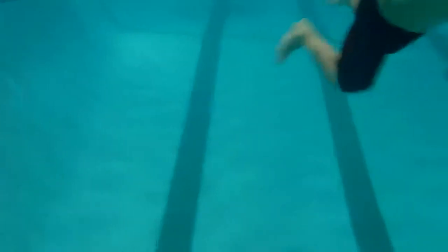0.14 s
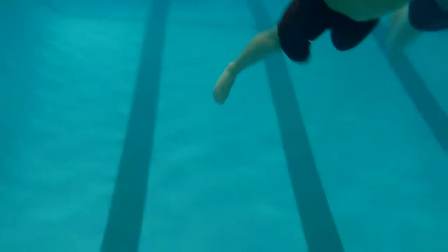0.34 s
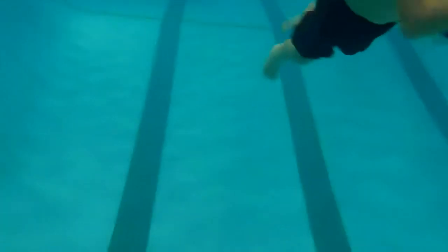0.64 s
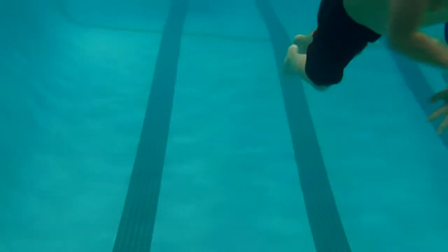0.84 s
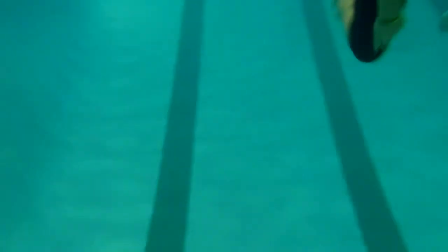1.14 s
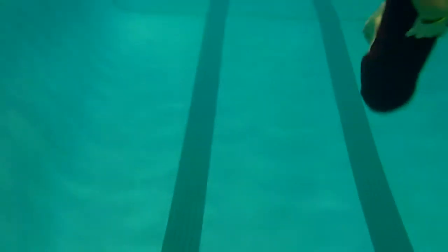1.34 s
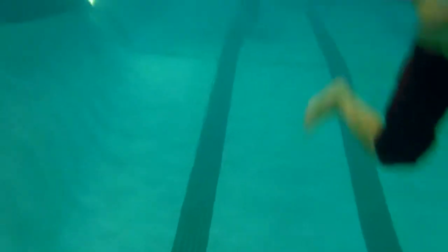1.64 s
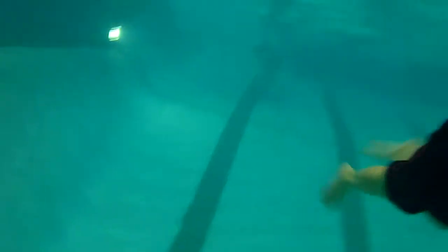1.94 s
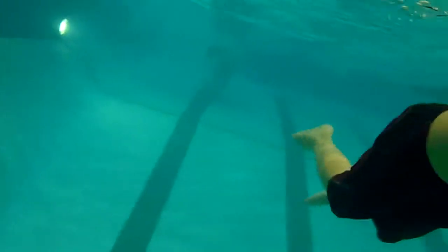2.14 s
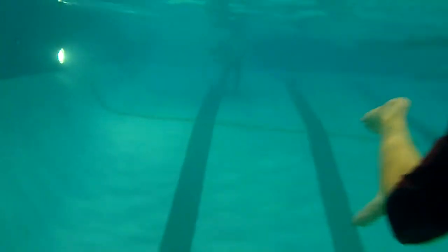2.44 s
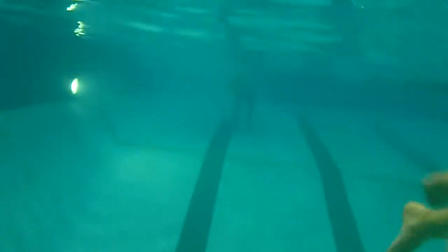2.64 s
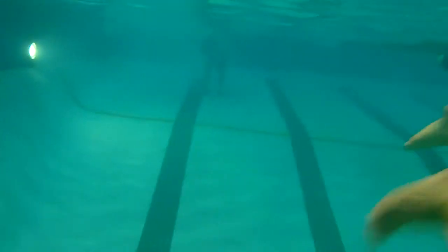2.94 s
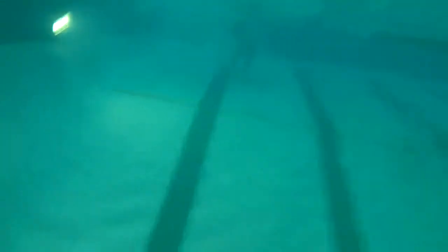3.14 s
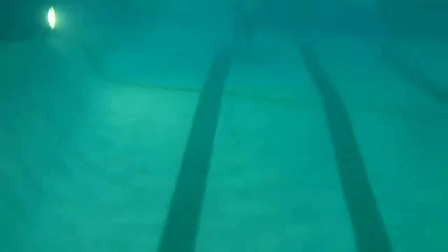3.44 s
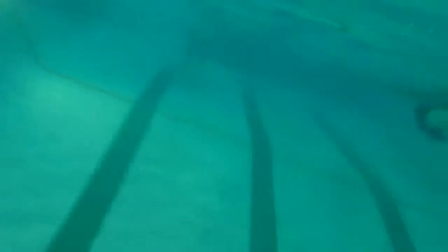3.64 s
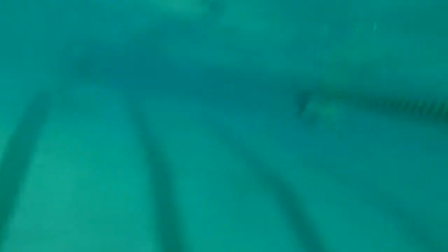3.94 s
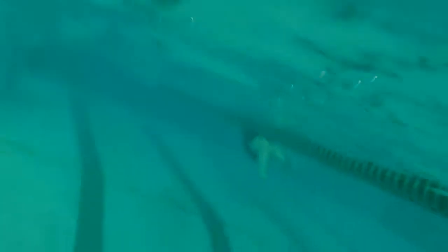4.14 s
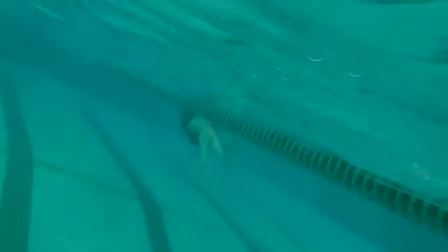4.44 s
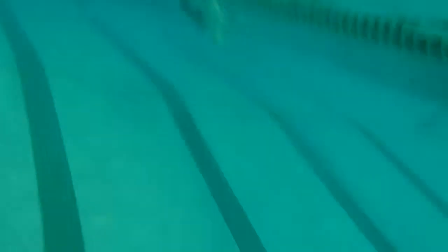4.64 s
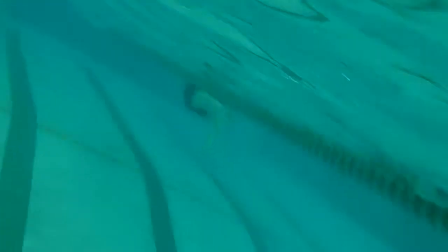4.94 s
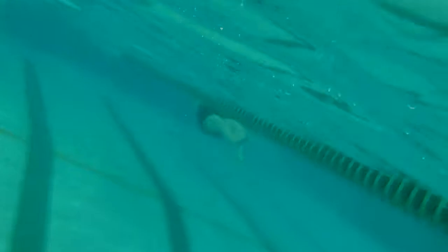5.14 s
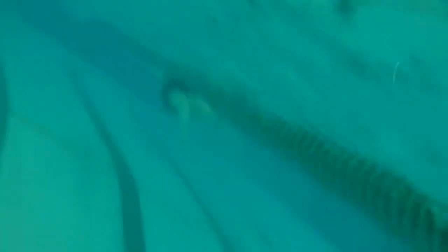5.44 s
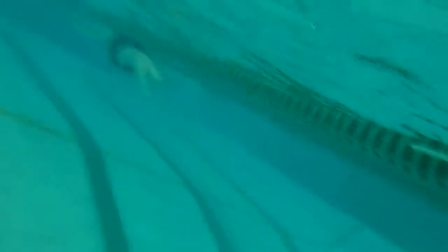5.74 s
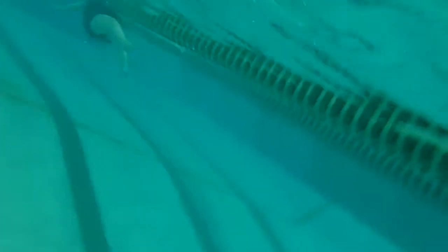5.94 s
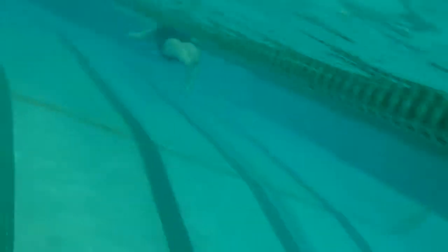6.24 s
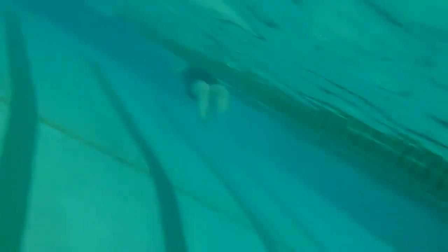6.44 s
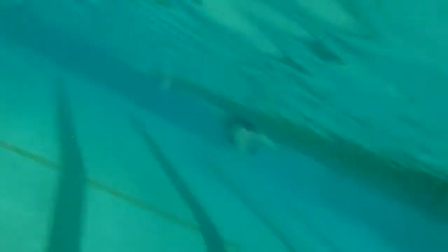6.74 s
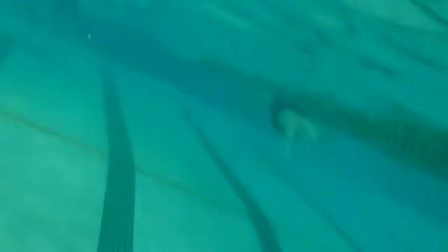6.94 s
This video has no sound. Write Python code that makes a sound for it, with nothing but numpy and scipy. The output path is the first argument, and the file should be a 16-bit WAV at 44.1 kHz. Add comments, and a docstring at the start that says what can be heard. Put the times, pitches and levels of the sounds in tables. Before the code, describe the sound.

Heard from inside the pool water: low rumbling turbulence, dull knocks, plopping bubbles and tiny ticks, turning fuller and rushier after a burst of bubbles.

```python
"""Under water in a pool: a swimmer carries a camera in a sealed housing, with the microphone at its port.
Churn, sway, gurgle and rush are shaped noise; small bubbles ring and a narrow band fizzes amid a faint hiss.
Swirls thump as short low pushes, water swishes, bubbles pop as decaying sines and tick as noise snaps.
A soft tone is heard from 0.6 to 1.1 s. The background dips at listed times and climbs back.
At 4 s a swarm of bubbles rattles and fizzes as the air leaves the port and the cavity changes colour."""
import sys
import numpy as np
from scipy import signal
from scipy.fft import rfft, irfft
from scipy.io import wavfile
from scipy.ndimage import uniform_filter1d

SR = 44100
rng = np.random.default_rng(int(sys.argv[2]) if len(sys.argv) > 2 else 0)


def volts_from_db(level):
    """Convert decibel levels to linear amplitude ratios."""
    exponent = np.asarray(level, float) / 20
    return 10 ** exponent


def log_audio(samples):
    """Write samples as a 16-bit WAV file to the path given in sys.argv[1]."""
    # one column per channel
    frames = np.atleast_2d(samples).T
    # limit to full scale, then quantise
    limited = np.clip(frames, -1, 1)
    pcm = np.round(limited * 32767).astype(np.int16)
    wavfile.write(sys.argv[1], SR, pcm)


N = 313110   # length [samples]


def rms_one(x):
    """Scale to unit rms."""
    return x / np.sqrt(np.mean(x ** 2) + 1e-20)


def in_time(rows):
    """Columns of a curve table at every sample."""
    s, *columns = np.transpose(rows)
    return [np.interp(np.arange(N) / SR, s, c) for c in columns]


def band(x, low_hz, high_hz):
    """Butterworth band-pass."""
    edges_hz = [low_hz, min(high_hz, 0.45 * SR)]
    return signal.sosfilt(signal.butter(2, edges_hz, "band", fs=SR, output="sos"), x)


def drift(rate_hz):
    """Slow chance of about unit spread: coarse noise through two equal one-pole low-passes."""
    hop = 40   # samples between coarse points
    r = np.exp(-2 * np.pi * rate_hz * hop / SR)
    white = rng.standard_normal(N // hop + 2002)
    slow = signal.lfilter([1], [1, -2 * r, r * r], white)[2000:]   # the filter has settled by then
    return np.interp(np.arange(N) / hop, np.arange(len(slow)), rms_one(slow))


def add(out, s, sound):
    """Mix a short sound in at time s, or at the start if s is negative."""
    i = max(round(s * SR), 0)
    out[i:i + len(sound)] += sound[:N - i]


def colour(white, points):
    """Noise given a spectrum in relative dB per Hz, joined along log frequency; rms 1."""
    hz = np.maximum(np.fft.rfftfreq(N, 1 / SR), 1)
    point_hz, point_db = np.transpose(points)
    shape_db = np.interp(np.log(hz), np.log(point_hz), point_db)
    return rms_one(irfft(rfft(white) * volts_from_db(shape_db), N))


def gate(start, end, attack, release):
    """Rise from the start, hold until the end, fall; both ramps are squared."""
    t = np.arange(N) / SR
    rise = (t - start) / attack
    fall = 1 + (end - t) / release
    return np.clip(np.minimum(rise, fall), 0, 1) ** 2


def swirl(low_hz, high_hz, edge_hz, lumpy_db, lumps_hz):
    """Turbulence on the housing: low noise that comes in lumps and falls away above an edge; rms 1."""
    lumpy = rng.standard_normal(N) * volts_from_db(lumpy_db * drift(lumps_hz))
    return rms_one(band(band(lumpy, low_hz, high_hz), 11.7, edge_hz))


def churn(churn_db, cleared, lumps):
    """Low turbulence rumbling on the housing, deeper once the air has left the port."""
    before = swirl(12.4, 103.4, 300, lumpy_db=2.5, lumps_hz=7.2)
    after = swirl(9.3, 67, 280, lumpy_db=3.5, lumps_hz=7.1)
    return volts_from_db(churn_db + 1.1 * lumps) * ((1 - cleared) * before + cleared * after)


def sway():
    """Slow sway of the water: a steady bed of very low, lumpy noise."""
    return volts_from_db(-38) * swirl(10.0, 38, 300, lumpy_db=3.5, lumps_hz=6.0)


def gurgle(churn_rise_db, rush_rise_db, cleared, lumps):
    """Mid-low turbulence that follows the flow and is weaker and less lumpy once the air has left."""
    level_db = -30.5 - 12 * cleared + 0.36 * churn_rise_db + 1.08 * rush_rise_db
    lumpy_db = (4.0 - 2.3 * cleared) * lumps
    return volts_from_db(level_db + lumpy_db) * swirl(85.5, 427, 920, lumpy_db=3.0, lumps_hz=19.4)


def rush(cleared, bright_db, patchy_db, grain_db):
    """Dense tiny bubbles coloured by the cavity; half-octave bands flicker mostly alone."""
    # cavity colour with air at the port: (frequency [Hz], relative level [dB per Hz])
    colour_with_air = [(240, -45), (400, -34), (518, -33), (638, 2), (733, 4), (988, -6.5), (1270, -4),
                       (1530, -7.5), (2590, -24), (2980, -28), (3520, -24.5), (3930, -33.5), (4300, -32),
                       (5590, -72), (9460, -120)]
    # cavity colour once the air has left: (frequency [Hz], relative level [dB per Hz])
    colour_cleared = [(240, -45), (400, -12.5), (520, -14.5), (703, 1.5), (926, -1), (1050, -7.5),
                      (1330, -9.5), (1730, -21.5), (2070, -18.5), (2530, -26), (3050, -40), (4120, -48.5),
                      (5560, -46), (8000, -99), (10400, -85), (17600, -120)]
    grains_per_s = 4000.0
    sizes = volts_from_db(grain_db * np.minimum(rng.exponential(1, (2, N)), 5))
    grains = rng.standard_normal((2, N)) * sizes * (rng.random((2, N)) < grains_per_s / SR)
    spectra = []
    for white in grains:
        before = (1 - cleared) * colour(white, colour_with_air)
        after = cleared * colour(white, colour_cleared)
        spectra.append(rfft(before + after))
    hz = np.fft.rfftfreq(N, 1 / SR)
    together, out = drift(9.1), 0
    for k in range(9):
        steps = 2 * np.log2(np.maximum(hz, 1) / 400) - k   # half octaves from the band's centre
        share = np.sqrt(np.clip(1 - np.abs(steps), 0, 1))   # neighbours overlap
        part = irfft(spectra[k % 2] * share, N)   # neighbours get unrelated grains
        lift = np.clip(1 - abs(k - 5.3) / 3.7, 0, 1)   # brightness acts most near 2.5 kHz
        flicker_db = patchy_db * (0.56 * together + drift(20.0))
        out = out + part * volts_from_db(lift * bright_db + flicker_db)
    return out


def blips(per_s, cycles):
    """Small bubbles at 14 pitches dealt by chance, each fading 60 dB in some cycles; rms 1."""
    clicks = (rng.random(N) < per_s / SR) * volts_from_db(6.6 * np.minimum(rng.exponential(1, N), 3))
    dealt, out = rng.integers(0, 14, N), 0
    for k, hz in enumerate(np.geomspace(550, 3700, 14)):
        r, w = volts_from_db(-60 * hz / (cycles * SR)), 2 * np.pi * hz / SR
        struck = clicks * (dealt == k) + 1e-18
        ring = signal.lfilter([0, np.sin(w)], [1, -2 * r * np.cos(w), r * r], struck)
        out = out + ring * volts_from_db(-9.0 * np.log2(hz / 550))   # smaller bubbles are fainter
    return rms_one(band(out, 460, 6200))


def fizz_band(cleared):
    """A band of grainy fizz near 4.9 kHz; after 4 s only a faint thin line near 5.8 kHz."""
    # swells of the fizz: (time of the middle [s], rise [dB])
    fizz_swells = [(.46, 5.5), (1.76, 3), (2.29, 9), (3.3, 2), (3.88, 8.5)]
    base_db, line_db, swell_s, grains_per_s = -60, -76, 0.1, 5000.0
    t = np.arange(N) / SR
    level_db = base_db + sum(rise_db * np.exp(-((t - s) / swell_s) ** 2) for s, rise_db in fizz_swells)
    sizes = volts_from_db(2.0 * np.minimum(rng.exponential(1, N), 5))
    grains = rng.standard_normal(N) * sizes * (rng.random(N) < grains_per_s / SR)
    fizz = volts_from_db(level_db) * rms_one(band(band(grains, 4420, 5420), 4420, 5420))
    thin_line = volts_from_db(line_db) * rms_one(band(grains, 5770, 5800))
    return volts_from_db(3.1 * drift(47.0)) * ((1 - cleared) * fizz + cleared * thin_line)


def steady_hiss():
    """Faint coloured noise behind the water."""
    # colour of the hiss: (frequency [Hz], relative level [dB per Hz])
    hiss_colour = [(3240, -13.5), (5500, -16), (6530, -16), (13700, -19), (14600, -17), (15000, -60)]
    return volts_from_db(-62) * colour(rng.standard_normal(N), hiss_colour)


def faint_ticks(per_s, smallest_db, low_hz, high_hz):
    """Small band-passed clicks at random times and sizes between the clear ticks."""
    sizes = volts_from_db(5.8 * np.minimum(rng.exponential(1, N), 3)) * rng.choice([-1, 1], N)
    return volts_from_db(smallest_db) * band((rng.random(N) < per_s / SR) * sizes + 1e-18, low_hz, high_hz)


def dips():
    """Gain of the background: a sudden fall, a short hold, a steady climb in dB."""
    # sudden dips of the background: (time [s], depth [dB])
    falls = [(0.0, 12.5), (1.49, 11), (1.85, 6), (1.91, 7.5), (2.01, 5.5), (3.537, 0), (3.563, 11.5),
             (3.891, 5.5), (3.94, 5), (4.03, 18), (4.2, 2), (4.235, 13), (5.163, 9), (5.424, 12),
             (5.803, 7), (5.834, 14.5), (5.88, 4.5), (5.938, 13), (6.201, 5.5), (6.35, 6), (6.932, 3.5)]
    recovery_db_per_s, hold_s = 107, 0.017
    t, depth = np.arange(N) / SR, np.zeros(N)
    for s, depth_db in falls:
        left_db = np.clip(depth_db - recovery_db_per_s * (t - s - hold_s), 0, depth_db)
        depth = np.maximum(depth, (t >= s) * left_db)   # the deepest wins
    return volts_from_db(-uniform_filter1d(depth, size=88))   # 2 ms smoothing


def gushes():
    """Swishes of water over the port: short rough noise, nearly three octaves wide, under a sharp top."""
    # swishes: (time of the middle [s], rms level before the swell [dB], top [Hz], length [s])
    swishes = [(0.027, -51.5, 4130, .06), (0.121, -43, 3020, 0.042), (0.177, -38.5, 3180, 0.017),
               (0.319, -37.5, 5400, .025), (0.403, -36.5, 4140, 0.17), (1.643, -37, 1760, 0.031),
               (2.718, -38, 5200, 0.0079), (3.863, -52, 5800, 0.036), (4.431, -39.5, 3700, .14),
               (4.777, -44, 5000, 0.024), (5.605, -43, 3700, .16), (5.731, -25, 3100, 0.031),
               (5.779, -26.5, 2550, 0.024), (5.862, -27.5, 2530, 0.017), (5.921, -29.5, 2200, 0.029),
               (5.93, -36, 3230, 0.022), (6.692, -34.5, 2800, 0.034), (6.902, -33.5, 3000, 0.044),
               (7.025, -23, 1290, 0.051)]
    out, t = np.zeros(N), np.arange(SR // 4) / SR
    for (s, level_db, top_hz, length), noise in zip(swishes, rng.standard_normal((len(swishes), len(t)))):
        edge = signal.butter(6, top_hz, fs=SR, output="sos")
        swish = rms_one(signal.sosfilt(edge, band(noise, 0.079 * top_hz, 0.53 * top_hz)))
        swell = np.sqrt(np.clip(np.sin(np.pi * np.minimum(t / length, 1)), 0, 1))
        add(out, s - length / 2, volts_from_db(level_db) * swish * swell)
    return out


def thumps():
    """Each swirl against the housing is one soft low push: a short windowed cosine at a random phase."""
    # pushes: (time of the middle [s], envelope peak [dB], pitch [Hz], width at half height [cycles])
    pushes = [(0.207, -15.5, 296, 0.88), (0.328, -7.5, 278, 0.66), (0.358, -14.5, 72, 0.86),
              (0.544, -17, 170, 2.7), (0.579, -7, 69.6, 0.4), (0.581, -6, 225, 1), (.335, -14.5, 130, 1.4),
              (0.506, -21, 60, .8), (0.609, -18.5, 118, 2.2), (1.267, -26, 300, 0.98),
              (1.294, -20.5, 336, 1.03), (1.388, -23, 129, 1.4), (1.425, -11, 269, 1.9),
              (1.432, -16.5, 75.0, 0.99), (1.486, -7, 293, 1.54), (1.75, -13, 263, 0.52),
              (1.764, -18, 260.0, 0.42), (1.775, -15, 267, 0.78), (1.798, -8.5, 89, 0.65),
              (1.815, -11.5, 282, 0.67), (1.844, -6, 296, 2.34), (1.909, -8, 247, 1.08),
              (1.999, -10.5, 81.4, 2.2), (2.008, -7.5, 250, 1.05), (2.064, -11, 320, 0.43),
              (2.101, -13.5, 251.0, 1.3), (2.162, -19, 245, 3.5), (2.378, -13, 302, 0.55),
              (2.4, -15, 257, 3.2), (2.417, -7.5, 314, 0.45), (2.432, -11.5, 333, 1.3),
              (2.626, -12, 265, 1), (2.694, 0, 256, 0.45), (2.76, -15.5, 84, 1.2), (2.758, -6, 263, 0.71),
              (2.776, -7, 270, 0.86), (3.059, -17, 278, 1.2), (3.076, -10, 251, 0.71),
              (3.076, -6.5, 81, 0.62), (3.204, -10, 62.3, 1.1), (3.265, -13, 69.5, 0.66),
              (3.311, -17, 357, 1.7), (3.509, -12, 82.0, 0.38), (3.537, -11.5, 292, 2.05),
              (3.708, -17, 63.4, 1.1), (3.793, -9.5, 350, 0.81), (3.847, -19, 253, 1.8),
              (3.849, -13, 75.6, 1.66), (3.879, -18, 221.0, 0.85), (3.936, -9, 287.0, 0.72),
              (3.98, -5, 232, 1.04), (4.003, -15.5, 327, 3.4), (4.023, -6.5, 252, 0.74),
              (4.154, -16.5, 295, 1.14), (4.181, -10, 54.5, 0.9), (4.23, -13, 450, 1.8),
              (4.427, -18, 57.0, 0.57), (4.501, -17.5, 51, 0.88), (4.569, -14.5, 64.0, 0.6),
              (4.802, -25, 66.0, 0.71), (5.095, -15, 46, 1.9), (5.25, -20.5, 63.4, 1.6),
              (5.397, -16.5, 221, 1.3), (5.68, -14.5, 50.4, 1.3), (5.723, -9.5, 328, 0.92),
              (5.728, -17, 48.0, 0.7), (5.788, -12.5, 154, 4.1), (5.79, -5.5, 99, 1.9),
              (5.799, -14.0, 280, 1.2), (5.814, -10.5, 231.0, 0.86), (5.865, -12.5, 345, 1.4),
              (5.872, -7.5, 50.4, 0.9), (6.034, -16.5, 66, 0.5), (6.11, -11, 80.5, 1.36),
              (6.182, -10, 49, 1.25), (6.183, -14, 159, 1.93), (6.312, -6.5, 214, 0.74),
              (6.33, -13, 212, 0.85), (6.335, -12, 82, 1.8), (6.349, -10, 233, 1.06),
              (6.386, -7, 66.4, 0.23), (6.427, -11, 65.5, 0.3), (6.485, -12.5, 84, 0.97),
              (6.683, -11, 81, 0.87), (6.689, -4.5, 264.0, 0.33), (6.704, -8.5, 266, 0.72),
              (6.714, -10.5, 53, 1.8), (6.782, -9.5, 304, 0.66), (6.84, -15, 68.0, 0.36),
              (6.901, -3, 278.0, 0.58), (6.908, -9, 72, 0.36), (6.918, -6.5, 312, 1.4),
              (7.024, -15.5, 328.0, 2)]
    out = np.zeros(N)
    for (s, peak_db, hz, cycles), turn in zip(pushes, rng.random((len(pushes), 1))):
        half = max(cycles, 0.3) / hz   # half of the whole length; at least 0.3 cycles
        t = np.arange(-half, half, 1 / SR)
        window = np.cos(np.pi / 2 * t / half) ** 2
        add(out, s - half, volts_from_db(peak_db) * window * np.cos(2 * np.pi * (hz * t + turn)))
    return out


def pops():
    """A bubble at the port rings, rises a little in pitch and dies; long rings start more softly."""
    # pops: (time [s], level before the soft start [dB], starting pitch [Hz], fall by 60 dB [s])
    bubbles = [(.205, -19, 670, 0.024), (.497, -25.5, 1620, 0.031), (0.578, -6.5, 636, 0.0071),
               (1.102, -39, 3450, 0.029), (1.426, -16.5, 1067, 0.042), (1.483, -4.5, 1112, 0.032),
               (1.486, -25, 1850, 0.034), (1.73, -14, 1670, 0.0082), (1.843, -9, 2640, 0.014),
               (1.907, 0, 910, 0.014), (1.931, -23, 1530, 0.0063), (2.004, -7.5, 3350, 0.0091),
               (2.023, -23, 1550, 0.011), (2.063, -13.5, 865, 0.025), (2.088, -5, 710, 0.015),
               (2.09, -10.5, 2130, 0.0089), (2.099, -2, 1000, 0.01), (2.683, -6.5, 660, 0.019),
               (2.714, -20, 1320, 0.053), (2.752, -2.5, 1370, 0.0067), (2.975, -15.5, 535, 0.03),
               (3.31, -5.5, 595, 0.011), (3.454, -19, 2670, 0.0073), (3.534, 2, 950, 0.016),
               (3.556, -9, 1020, 0.021), (3.556, -19, 3660, 0.011), (3.789, -15, 654, .029),
               (3.935, -3, 900, 0.014), (3.958, -20, 5000, 0.0066), (3.968, -18, 3940, 0.038),
               (3.973, -12, 1740, .012), (4.002, -2, 880, 0.0071), (3.979, -0.5, 674, 0.0073),
               (3.984, -4.5, 1100, 0.014), (3.992, -16, 3170, 0.017), (4, -20, 2380, 0.012),
               (4.016, -3, 830, 0.012), (4.021, -0.5, 766, 0.0075), (4.17, -10, 726, 0.013),
               (4.229, -3, 1213, 0.021), (4.466, -9.5, 910, 0.012), (5.335, -33.5, 2670, 0.09),
               (5.359, -4, 766, 0.019), (5.407, -7.5, 809, 0.066), (5.413, -7.5, 1025, 0.032),
               (5.534, -30.5, 2500, 0.04), (5.537, -15, 1071, 0.11), (5.645, -7.5, 730, 0.029),
               (5.721, -6, 660, 0.03), (5.772, -11.5, 920, 0.027), (5.842, -16, 1960, 0.013),
               (5.842, -10.5, 726, 0.01), (5.861, -7.5, 710, 0.021), (5.734, -24, 1950, 0.041),
               (5.928, -26, 2000, 0.035), (6.391, -26, 5000, 0.009), (6.392, -14.5, 1020, .016),
               (6.774, -13.5, 1290, 0.032), (6.817, -17, 660, 0.023), (7.013, -13, 983, 0.046)]
    out, t = np.zeros(N), np.arange(SR // 6) / SR
    for s, level_db, hz, t60 in bubbles:
        ring = np.sin(2 * np.pi * hz * t * (1 + 0.76 * t)) * volts_from_db(-60 * t / max(t60, 0.004))
        soft_start = 1 - np.exp(-t / (0.0001 + 0.0087 * t60))
        add(out, s, volts_from_db(level_db) * ring * soft_start)
    return out


def ticks():
    """Snaps of noise a few milliseconds long in three parts, weaker away from the tick's centre."""
    # ticks at the port: (time [s], strength at the centre [dB], centre [octaves above 1 kHz])
    snaps = [(0.5624, -33, 2.0), (.7258, -35, 2.0), (1.0086, -20, 1.5), (1.4263, -19, 2.27),
             (1.4851, -4.5, 0.48), (1.487, -24, 2.9), (1.5995, -29.5, 2.3), (1.7317, -32, 0.67),
             (1.8323, -25, 1.4), (1.843, -12, 0.96), (1.9053, -3, 1.03), (2.0054, -20, 1.05),
             (2.089, -25, 0.54), (2.098, -10, 1.17), (2.202, -29, 1.55), (2.2327, -26, 1.1),
             (2.314, -31, 0.55), (2.3517, -40, 3), (2.3883, -29, .6), (2.433, -28.5, 0.56),
             (2.4687, -15, 1.58), (2.712, -34, .8), (2.717, -30, 1.3), (2.753, -7.5, 0.3),
             (2.781, -34, 2.0), (2.8897, -31, 0.92), (3.31, -9, 0.98), (3.4538, -15, 1.14),
             (3.5327, 0, 1.07), (3.5356, -11.5, 2.82), (3.5549, -14, 1.1), (3.7894, -23, 1.0),
             (3.87, -26, 2), (3.882, -29, 2.0), (3.936, -7.5, 1.1), (3.956, -31, 2.0), (3.9785, -14, 1.4),
             (3.99, -13, 0.94), (3.999, -15, 1.3), (4.018, -8.5, 1.1), (4.0228, -13, 0.94),
             (4.032, -39, 2.6), (4.1835, -28, .6), (4.1897, -28.5, 2.6), (4.229, -10, 0.7),
             (4.23, -29, 3.0), (4.3205, -31, 2.7), (4.4895, -25, 2.4), (4.5963, -27.5, 2.8),
             (4.8638, -27, 2.8), (5.1194, -28, 2.4), (5.1268, -26, 2.6), (5.1596, -21, 2.5),
             (5.3653, -26, 2.7), (5.374, -27, 0.92), (5.416, -26, 0.55), (5.42, -24, .8),
             (5.6294, -28.5, 2.75), (5.7172, -27, 1.3), (5.7237, -12.5, 0.51), (5.7327, -27, .6),
             (5.759, -29, 2.7), (5.7806, -25, 2.3), (5.7946, -31, 3.0), (5.8416, -19, 0.93),
             (5.8615, -31, 2.9), (5.868, -22.5, 1.0), (6.1393, -31, 3.0), (6.188, -35, 2.7),
             (6.2328, -29.5, 2.57), (6.3842, -28.5, 2.7), (6.3922, -27, 0.66), (6.6349, -27, 2.73),
             (6.672, -28, 2.45), (6.698, -25.5, 2.5), (6.7737, -16, 0.37), (6.8814, -27, 2.7),
             (7.016, -30, 0.55)]
    fall_below_db, fall_above_db = 20, 15   # per octave away from the centre
    parts = [(1100, 2330, 0.011), (2500, 5270, 0.0082), (5000, 15000, 0.0048)]   # (low Hz, high Hz, t60 s)
    out, t = np.zeros(N), np.arange(SR // 40) / SR
    for (s, level_db, centre), snap in zip(snaps, rng.standard_normal((len(snaps), len(t)))):
        snap = snap + 2.13 * (t == 0)   # a sharp front, then a noisy tail
        for low_hz, high_hz, t60 in parts:
            away = np.log2(np.sqrt(low_hz * high_hz) / 1000) - centre   # octaves
            peak_db = level_db - max(fall_above_db * away, -fall_below_db * away)
            part = band(band(snap * volts_from_db(-60 * t / t60), low_hz, high_hz), low_hz, high_hz)
            add(out, s, volts_from_db(peak_db) * part / np.abs(part).max())
    return out


def tone():
    """A soft, veiled near-sine: it sags and wavers in pitch, flutters in level, swells and fades."""
    start_s, end_s, peak_after_s = 0.602, 1.093, 0.18
    start_hz, sag_hz_per_s = 333, 28.8
    peak_db, slope_db_per_s = -37.5, 35   # rms; same slope up and down
    since = np.clip(np.arange(N) / SR - start_s, 0, 1)
    hz = (start_hz - sag_hz_per_s * since) * (1 + 0.042 * drift(40.0))
    swell_db = peak_db - slope_db_per_s * np.abs(since - peak_after_s)
    level = volts_from_db(swell_db + 2.5 * drift(20.0)) * gate(start_s, end_s, 0.012, 0.03)
    return np.sqrt(2) * level * np.sin(2 * np.pi * np.cumsum(hz) / SR)


def burst():
    """A swarm of bubbles past the port: uneven clicks rattle below; dense fizz above leads and fades."""
    # swarms: (start [s], length [s], rattle rms level [dB], fizz rms level [dB])
    swarms = [(3.963, 0.0412, -19.5, -33.5), (4.02, 0.0067, -30, -39.5)]
    attack_s, release_s, fizz_lead_s, fizz_fade_db_per_s = 0.007, 0.0055, 0.008, 500
    rattle, hiss, t = 0, 0, np.arange(N) / SR
    for s, length, rattle_db, fizz_db in swarms:
        rattle = rattle + volts_from_db(rattle_db) * gate(s, s + length, attack_s, release_s)
        fade_db = fizz_fade_db_per_s * np.clip(t - s, 0, 1)
        hiss = hiss + volts_from_db(fizz_db - fade_db) * gate(s - fizz_lead_s, s + length, attack_s, release_s)
    sizes = volts_from_db(3.4 * np.minimum(rng.exponential(1, N), 4))
    clicks = rng.standard_normal(N) * sizes * (rng.random(N) < 3000.0 / SR)   # 3000 per second
    fizz = rng.standard_normal(N) * volts_from_db(2.5 * drift(200.0))
    return rattle * rms_one(band(clicks, 390, 1730)) + hiss * rms_one(band(fizz, 2800, 7500))


def scene():
    """Flow, hiss and tone under the dips, with the near events at the port on top."""
    # motion of the water at the housing: (time [s], churn level [dB], rush level [dB])
    water_motion = [(0.0, -28.5, -40), (0.3, -27.5, -38), (0.55, -26.5, -40), (0.72, -41.5, -41.5),
                    (0.95, -52, -41.5), (1.48, -38.5, -40.5), (1.84, -38, -36.5), (2.2, -31, -34.5),
                    (2.65, -34, -35.5), (2.9, -25.5, -39.5), (3.18, -24, -34.5), (3.4, -28, -36.5),
                    (3.7, -27, -42.5), (3.85, -17.5, -34), (4.2, -23.5, -25), (4.6, -26.5, -29),
                    (5.1, -20, -29.5), (5.32, -21.5, -29), (5.44, -22.5, -28), (5.65, -40, -26),
                    (5.8, -8.5, -28.5), (6.1, -26.5, -27), (6.3, -17, -27.5), (6.7, -30.5, -29),
                    (6.9, -15, -27.5), (7.1, -24.5, -30.5)]
    port_clears_s = 4.03
    churn_db, rush_db = in_time(water_motion)
    churn_rise_db, rush_rise_db = churn_db + 28, rush_db + 35   # above a reference flow
    cleared = np.clip((np.arange(N) / SR - port_clears_s) / 0.02, 0, 1)   # 0 air at the port, 1 wet
    # the rush's upper bands are set lower when churn and rush levels are higher, and higher at a wet port
    bright_db = -2.5 + 4 * cleared - 0.11 * churn_rise_db - 0.43 * rush_rise_db
    lumps = drift(15.3)   # one eddy shakes churn and gurgle together

    flow = churn(churn_db, cleared, lumps) + sway()
    flow += gurgle(churn_rise_db, rush_rise_db, cleared, lumps)
    small_bubbles = volts_from_db(-11.0) * blips(per_s=150.0, cycles=26.0)
    flow += volts_from_db(rush_db) * (rush(cleared, bright_db, patchy_db=2.0, grain_db=1.0) + small_bubbles)
    flow += fizz_band(cleared)

    hiss = steady_hiss()
    # bright ticks, more once the port is wet; then duller ones, mostly with air at the port
    hiss += faint_ticks(54.0 * (0.43 + 0.6 * cleared), smallest_db=-44.5, low_hz=3500, high_hz=14000)
    hiss += faint_ticks(12.0 * (1 - 0.93 * cleared), smallest_db=-42, low_hz=2500, high_hz=6200)

    near = gushes() + thumps() + pops() + ticks() + burst()
    return ((flow + hiss + tone()) * dips() + near)[None]


def low_pass(x):
    """Removes everything above the highest recorded frequency."""
    return signal.sosfilt(signal.butter(12, 15860, fs=SR, output="sos"), x)


def record(dry):
    """Peaks at the microphone are rounded near full swing, then the extreme top is shelved 22 dB down."""
    rounded = 0.76 * np.tanh(dry / 0.8)
    top_cut = signal.cheby2(8, 22, 14700, fs=SR, output="sos")
    finished = signal.sosfilt(top_cut, rounded)
    return low_pass(finished)


dry = scene()
out = record(dry)
log_audio(out)
```